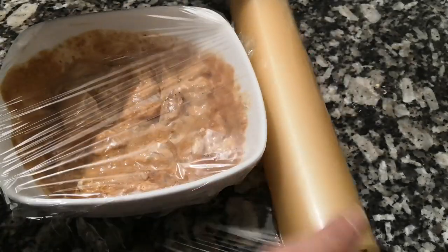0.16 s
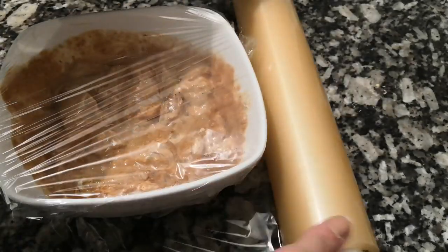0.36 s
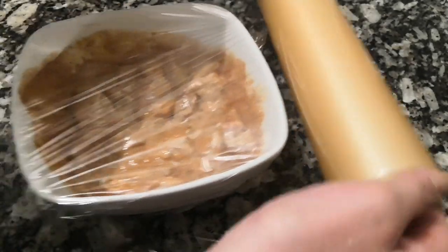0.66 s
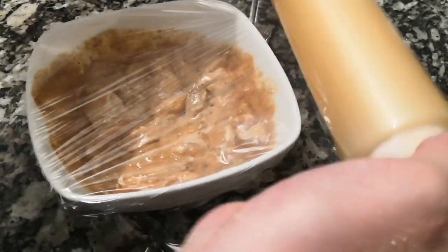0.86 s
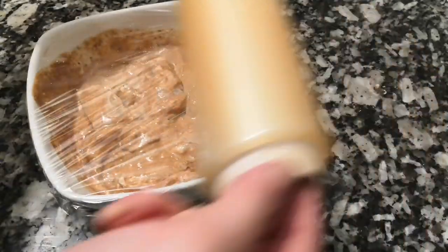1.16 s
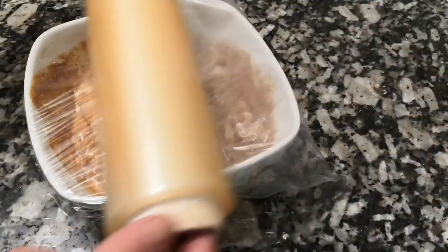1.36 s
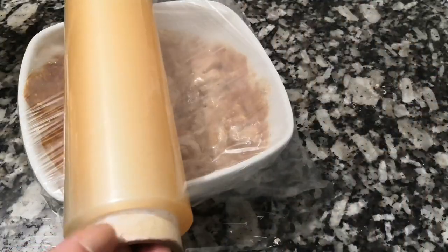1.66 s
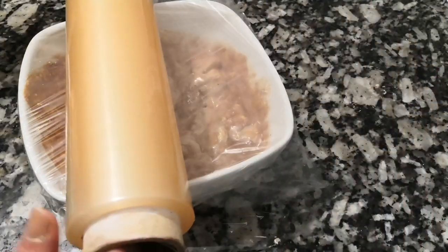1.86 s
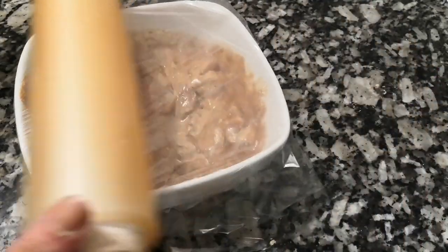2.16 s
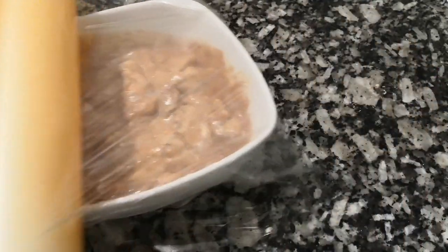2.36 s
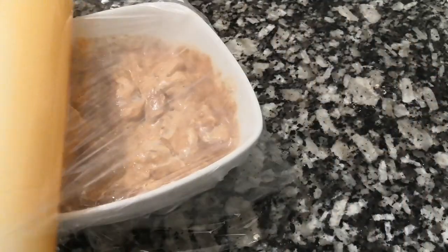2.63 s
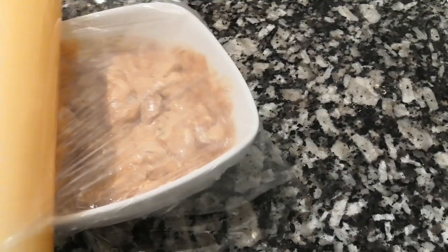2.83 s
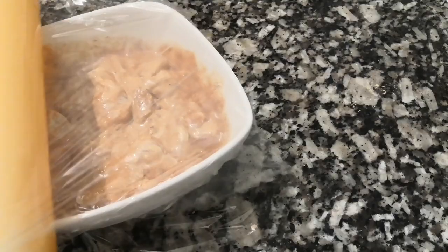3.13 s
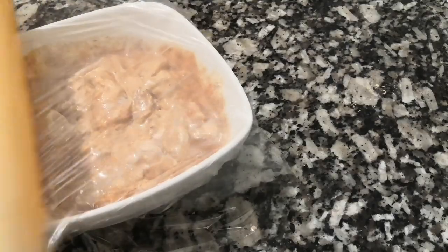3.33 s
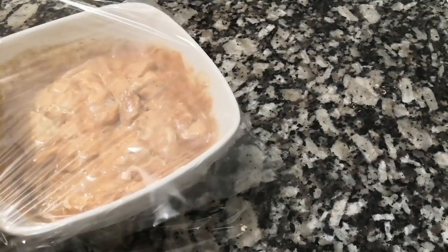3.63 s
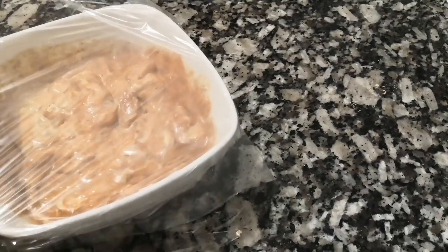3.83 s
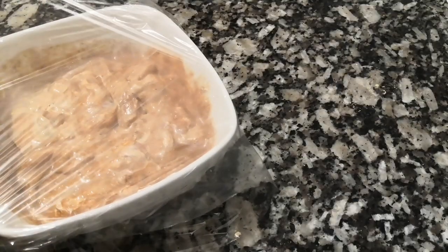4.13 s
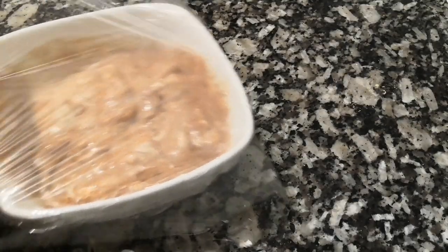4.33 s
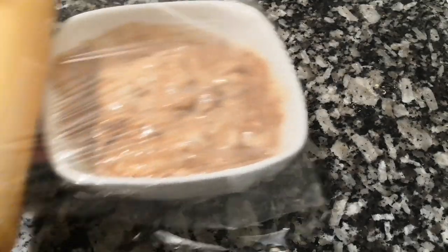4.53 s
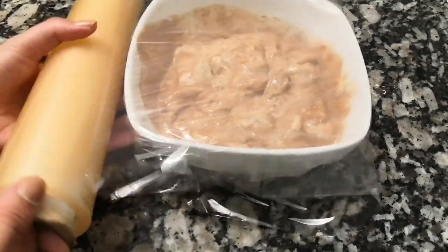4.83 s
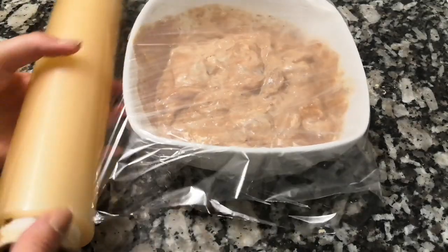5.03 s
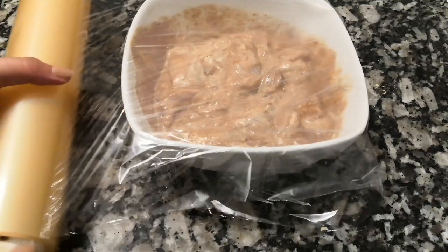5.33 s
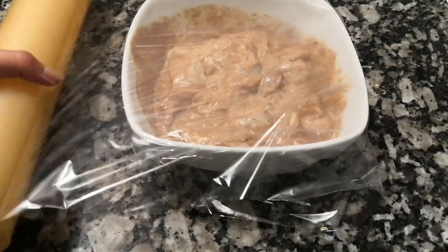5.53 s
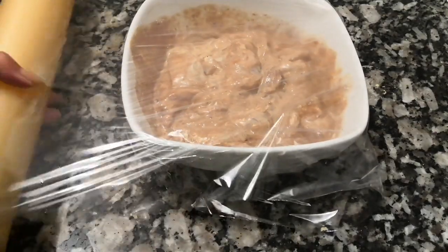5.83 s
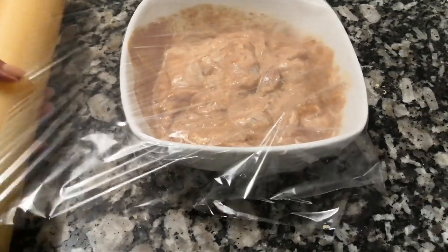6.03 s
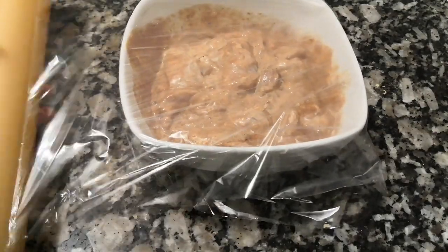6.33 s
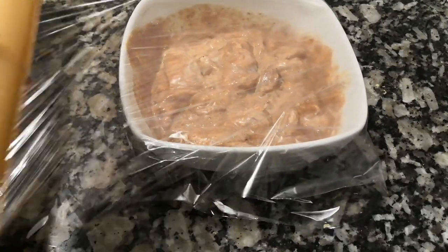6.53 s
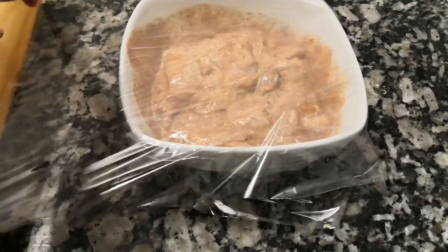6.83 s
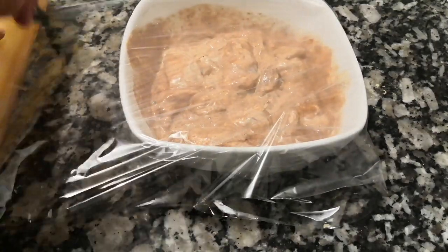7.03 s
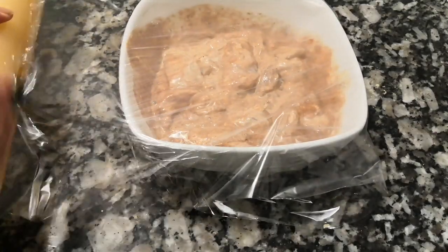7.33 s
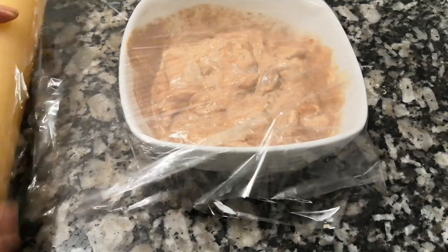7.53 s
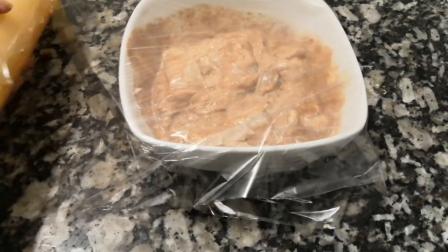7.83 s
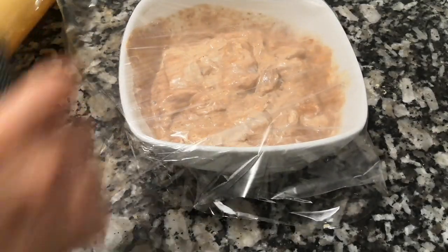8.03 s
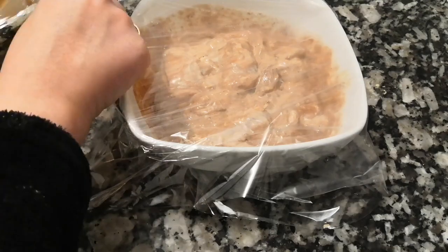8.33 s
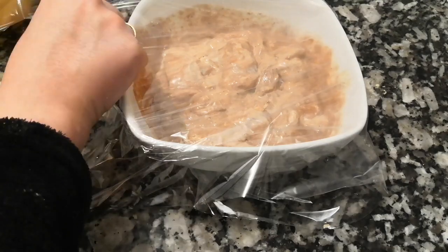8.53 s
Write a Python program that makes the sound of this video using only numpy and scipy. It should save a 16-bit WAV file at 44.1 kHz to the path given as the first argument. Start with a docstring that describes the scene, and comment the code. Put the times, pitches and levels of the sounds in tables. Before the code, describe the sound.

Close-up plastic film fizzes and pops as a heavy roll and bowl knock on stone, then the sheet rips loudly in a kitchen.

```python
"""Film fizzes and snaps over a low hum, amid hard knocks, drags on stone and a dense burst of tearing.
Cling film is drawn off a heavy roll and torn round a bowl on a stone worktop in a small, hard kitchen.
Film sounds are noise bursts through resonances; bowl, roll and worktop ring as sums of damped modes.
Two spaced microphones hear close sounds at different moments, the room as decaying noise.
A noise suppressor turns quiet passages down."""
import sys
import numpy as np
from scipy import signal
from scipy.fft import rfft, irfft, next_fast_len
from scipy.io import wavfile
from scipy.ndimage import uniform_filter1d, minimum_filter1d, map_coordinates

SR = 44100
rng = np.random.default_rng(int(sys.argv[2]) if len(sys.argv) > 2 else 0)


def unload_wav(signal):
    """Save mono or channel-first audio to the path in sys.argv[1] as 16-bit WAV at rate SR, clipped to [-1, 1]."""
    wavfile.write(
        sys.argv[1],
        SR,
        np.round(np.clip(np.atleast_2d(signal).T, -1, 1) * 32767).astype(np.int16),
    )


N = 382788  # samples
LEAD = .00025  # s by which the left microphone hears film and rim before the right


def amp(db):
    """Decibels to a linear gain."""
    return 10 ** (np.asarray(db) / 20)


def unit(x):
    """Scale to rms 1."""
    return x / np.sqrt(np.mean(x ** 2) + 1e-20)


def along(points, hz):
    """Read (Hz, value) points on a log frequency axis."""
    f, v = np.transpose(points)
    return np.interp(np.log(hz + 1), np.log(f + 1), v, left=v[0], right=v[-1])


def wobble(rate):
    """A smooth random curve, rate knots a second."""
    return map_coordinates(rng.standard_normal(size=1000), [np.arange(N) * rate / SR])


def filtered(x, response):
    """Multiply the spectrum of x by a response, real or complex, of frequency."""
    n = x.shape[-1]
    m = next_fast_len(n + 2048)
    return irfft(rfft(x, m) * response(np.fft.rfftfreq(m, 1 / SR)), m)[..., :n]


def coloured(points):
    """A filter response from (Hz, dB) points."""
    return lambda hz: amp(along(points, hz))


def band(hz, q):
    """A resonance of peak gain 1."""
    return lambda f: 1j * f * hz / q / (hz * hz - f * f + 1j * f * hz / q)


def puff(t, attack, life, response):
    """A dying burst of scattered ticks, even in colour before its response; peak 1."""
    shape = amp(-60 * t / life) * (1 - np.exp(-t / attack))
    z = rfft(rng.standard_normal(len(t)) * shape)
    even = irfft(z / np.abs(z), len(t))
    x = filtered(even * np.sqrt(shape), response)
    return x / np.abs(x).max()


def ring(modes, t, attack, scatter_db):
    """Modes struck at new strengths, each dying at its own speed; peak 1."""
    hz, db, t60 = np.transpose(modes)[..., None]
    level = db + scatter_db * rng.standard_normal(hz.shape)
    partials = amp(level - 60 * t / t60) * np.sin(2 * np.pi * hz * t)
    x = partials.sum(0) * (1 - np.exp(-t / attack))
    return x / np.abs(x).max()


FAVOUR_OCTAVES = 0.089  # reach of the modes that a contact point favours


def favoured(modes, centre_hz, lift_db):
    """The point of contact lifts the modes near one pitch."""
    def lift(hz):
        return lift_db * np.exp(-(np.log2(hz / centre_hz) / FAVOUR_OCTAVES) ** 2)
    return [(hz, db + lift(hz), t60) for hz, db, t60 in modes]


def grains(rate, spread_db, clump_db):
    """Random ticks of uneven size, coming in clumps; rms 1."""
    chance, size = rng.random(N), rng.standard_exponential(N)
    struck = chance < rate / SR * amp(clump_db * wobble(55))
    ticks = struck * amp(spread_db * np.minimum(size, 4))
    return unit(ticks * rng.choice([-1, 1], N))


def swell(t, s, rise, hold, fall):
    """Gain that climbs 20 dB in rise seconds up to s, holds, and drops 20 dB in fall seconds."""
    climb = (t - s) / max(rise, .005)
    drop = (s + hold - t) / max(fall, .005)
    return amp(20 * np.minimum(0, np.minimum(climb, drop)))


def add(out, s, x, pan_db, lead):
    """Place a sound between the microphones; the right one hears it lead seconds later."""
    for channel, start, gain in zip(out, (s, s + lead), amp([pan_db / 2, -pan_db / 2])):
        part = channel[round(start * SR):][:len(x)]
        part += gain * x[:len(part)]


# likeness of the two microphones in the room sound: hz, correlation (-1 to 1)
ROOM_LIKENESS = [(30, 0.76), (90, 1), (180, 0.75), (260, 0.91), (380, 0.19), (550, -0.66), (790, -0.13),
                 (1650, 0.18), (7180, -0.12), (15000, -0.23)]


def diffuse(pair):
    """Sound from all sides: alike in the bass, partly opposed in the low mids, near unrelated above."""
    turn = lambda hz: np.arccos(np.clip(along(ROOM_LIKENESS, hz), -1, 1)) / 2
    mid, side = filtered(pair, lambda hz: np.array([np.cos(turn(hz)), np.sin(turn(hz))]))
    return np.array([mid + side, mid - side])


# colour of the kitchen air: hz, level_db (relative)
AIR_COLOUR = [(20, -10), (75, -7.5), (110, -2.5), (280, -8), (630, -18.5), (1000, -23), (2000, -19.5),
              (4000, -27), (8000, -28), (10500, -36), (13000, -43.5), (15300, -42), (16400, -58.5)]
# hum of an appliance: pitch_hz, level_db (rms), waver_hz
HUM_TONES = [(142.9, -62.5, 2.9), (287.5, -68, 9.1), (2000, -76, 0.6), (5240, -86, 1.2)]
AIR_DB = -57.5  # mean level


def background():
    """Diffuse kitchen air as coloured noise, and an appliance's hum as tones wavering in pitch and level."""
    air = unit(filtered(diffuse(rng.standard_normal((2, N))), coloured(AIR_COLOUR)))
    hum = 0
    for hz, db, waver in HUM_TONES:
        phase = 2 * np.pi * np.cumsum(hz + waver * wobble(26)) / SR
        hum = hum + np.sqrt(2) * amp(db + 1.0 * wobble(12.0)) * np.sin(phase)
    return amp(AIR_DB + 0.3 * wobble(1.0)) * air + hum


# the sheet is handled: full_s (the moment the crinkle reaches its full level), rise_s (before it),
# hold_s, fall_s, fizz_db, rustle_db
HANDLING = [(0.0, .05, 0.103, 0.061, -73.5, -68), (0.36, 0.11, 0.31, 0.28, -63, -66),
            (0.757, 0.058, 0.12, 0.14, -62, -70.5), (1.18, 0.15, 0.19, 0.051, -67, -61),
            (1.768, 0.13, 0.48, 0.094, -67.5, -69), (2.004, 0.048, 0.096, 0.13, -55, -60),
            (2.252, 0.057, 0.026, 0.044, -59, -59), (2.079, .02, 0.033, 0.032, -59, -54),
            (2.657, 0.38, 0.13, 0.53, -67.5, -71), (3.04, 0.41, 0.2, 0.05, -70.5, -64.5),
            (3.226, 0.013, 0.057, 0.078, -46.5, -50), (3.446, 0.027, .01, 0.48, -65, -55),
            (3.739, 0.47, 0.21, 0.077, -73.5, -72.5), (4.22, 0.077, 0.0082, 0.051, -62.5, -76.5),
            (4.576, 0.4, 0.12, .05, -63, -86), (4.677, 0.011, 0.09, 0.057, -50.5, -80),
            (4.809, 0.005, 0.035, 0.093, -55, -83), (5.198, 0.061, 0.089, 0.14, -62, -63.5),
            (5.801, 0.23, 0.012, 0.027, -61, -56), (6.04, 0.038, 0.025, 0.16, -68, -59),
            (7.108, 0.0068, 0.046, 0.036, -39, -44), (7.154, 0.2, 0.2, 0.036, -47, -47.5),
            (7.365, 0.027, 0.2, 0.22, -47, -47.5), (8.292, 0.22, 0.1, 0.43, -61.5, -68)]
# colours of the fine and the dull crinkle: hz, level_db (relative)
FIZZ_COLOUR = [(1470, -44.5), (2500, -1), (2680, -7.5), (4270, -6.5), (4960, -3.5), (9080, -8),
               (14400, -35), (15500, -35.5), (16400, -55)]
RUSTLE_COLOUR = [(250, -13.5), (500, -7), (900, 0.5), (1500, 1), (2500, -4), (3500, -6), (5000, -29.5)]


def crinkle():
    """Thousands of tiny creases all over the sheet: a bright fizz and a duller rustle."""
    t = np.arange(0, N + 32, 32) / SR
    gains = sum(amp(row[4:])[:, None] * swell(t, *row[:4]) for row in HANDLING)
    fizz_gain, rustle_gain = (np.interp(np.arange(N) / SR, t, gain) for gain in gains)
    fizz = unit(filtered(grains(rate=910, spread_db=5.5, clump_db=10.0), coloured(FIZZ_COLOUR)))
    rustle = unit(filtered(grains(rate=1000, spread_db=6.0, clump_db=6.0), coloured(RUSTLE_COLOUR)))
    return fizz_gain * fizz + rustle_gain * rustle


# creases of the film popping: start_s, level_db, bright_hz, body_db (re level), body_hz,
# life_s (2 ms at the least)
CREASES = [(0.0557, -39.5, 4980, 12, 2680, 0.003), (0.1938, -43.5, 4480, 15, 3120, 0.003),
           (0.7663, -35.5, 6900, -13, 2075, 0.0099), (0.906, -47, 3000, 5.5, 2004, 0.0023),
           (1.276, -47.5, 6030, 14.5, 2250, 0.0025), (1.395, -41, 7930, -1, 2287, 0.0096),
           (1.714, -39.5, 8900, 2, 880, 0.0017), (1.896, -42, 7000, 0.5, 1605, 0.0034),
           (1.9056, -38.5, 6420, -3, 1622, 0.0032), (1.917, -36.5, 7850, -6, 1550, 0.0014),
           (1.9935, -35, 7580, -0.5, 1630, 0.008), (2.0054, -29.5, 9100, -3.5, 2350, 0.0048),
           (2.0436, -35.5, 4750, 2.5, 2330, 0.013), (2.078, -27, 7440, 0, 2560, 0.011),
           (2.089, -16.5, 6900, 0.5, 2100, 0.014), (2.4945, -40.5, 7860, 2, 905, 0.0064),
           (2.534, -46, 9000, 13.5, 1150, 0.0031), (2.782, -45.5, 7500, -3, 2500, 0.003),
           (3.0964, -35.5, 7640, -16, 900, 0.0035), (3.138, -38.5, 7070, -1.5, 2380, 0.0044),
           (3.179, -43.5, 7500, -8, 2000, 0.0036), (3.211, -40, 6860, 5, 2660, 0.0035),
           (3.22, -32, 7850, 3.5, 1740, 0.013), (3.2357, -19.5, 7400, -2, 1400, 0.004),
           (3.256, -22.5, 7050, 2, 1650, 0.0029), (3.291, -22, 8200, 0.5, 1413, 0.005),
           (3.5207, -39.5, 8500, 6.5, 1580, 0.0089), (3.583, -25.5, 8240, -0.5, 1700, 0.0034),
           (3.662, -28, 8600, -1, 1704, 0.0075), (3.923, -37, 9060, -7, 2520, 0.0024),
           (4.682, -42, 7830, 2, 2320, 0.0096), (5.087, -41.5, 9000, -10, 2350, 0.0024),
           (5.099, -44, 8200, -17, 2350, 0.0028), (5.2625, -43, 8800, 1.5, 1420, 0.0031),
           (5.457, -44, 7700, 0, 1940, 0.0038), (5.471, -44, 4440, -6, 1850, 0.0027),
           (5.801, -40, 6000, 10.5, 2630, 0.004), (6.8067, -33, 5780, -6.5, 1380, 0.0054),
           (7.0568, -41, 6900, 0, 1465, 0.0038), (7.103, -10, 5320, -8, 1357, 0.0049),
           (7.1066, -17, 7130, 0, 1600, 0.018), (7.116, -18.5, 6730, -4.5, 1590, 0.011),
           (7.1214, -23.5, 6530, 2.5, 1595, 0.014), (7.1293, -18.5, 7970, 0, 1900, 0.0025),
           (7.135, -17, 5210, 0, 1834, 0.0054), (7.156, -24, 6000, 0.5, 1180, 0.004),
           (7.1595, -15.5, 7900, -8, 1187, 0.004), (7.1865, -22, 9240, -7, 1336, 0.005),
           (7.198, -27, 5520, -3, 1657, 0.0026), (7.216, -23, 7340, -11, 1354, 0.003),
           (7.2547, -28.5, 6000, -4, 3200, 0.0029), (7.263, -31, 7540, -2, 2000, 0.0031),
           (7.2804, -26, 5760, -2, 2730, 0.0038), (7.292, -29.5, 8070, 1.5, 2195, 0.0055),
           (7.3373, -28, 7800, -10, 2400, 0.01), (7.3397, -27, 5400, -2, 1900, 0.005),
           (7.346, -24.5, 7800, -4.5, 2410, 0.004), (7.35, -20, 8000, -3.5, 2740, 0.004),
           (7.37, -28, 7800, -6.5, 2000, 0.0089), (7.3923, -39.5, 8130, -4.5, 2480, 0.0052),
           (7.398, -33, 6000, -1.5, 1320, 0.008), (7.4135, -24, 8000, 0, 3100, 0.006),
           (7.4198, -34.5, 8000, -8.5, 2570, 0.0026), (7.443, -27.5, 8000, -2.5, 3480, 0.0051),
           (7.444, -17, 8260, -10, 2730, 0.0012), (7.4588, -11.5, 8600, -9.5, 2320, 0.0017),
           (7.473, -23.5, 4950, -3, 2654, 0.0045), (7.486, -22.5, 7000, -1.5, 2350, 0.0044),
           (7.5218, -18.5, 8300, -4, 3320, 0.0019), (7.5445, -7, 7430, -9.5, 3100, 0.0044),
           (7.5519, -12, 7480, -11, 3180, 0.0017), (7.5538, -20.5, 8500, -4, 3290, 0.0019),
           (7.5724, -10.5, 5500, 2, 2790, 0.0036), (7.576, -16, 5600, -0.5, 2030, 0.007),
           (7.589, -29, 5530, -6, 3000, 0.004), (7.627, -27.5, 5500, -1, 2900, 0.0036),
           (7.772, -34.5, 5500, -4, 2600, 0.0035), (7.828, -36, 7500, -8, 2800, 0.0025),
           (8.2912, -28, 6000, -11, 1420, 0.0055), (8.371, -41, 6930, -2, 1260, 0.0029),
           (8.397, -39, 7470, -1, 1450, 0.0027), (8.442, -41, 7540, -8, 1310, 0.0034),
           (8.462, -50, 6930, 2, 1050, 0.003), (8.467, -45, 5000, 6.5, 1386, 0.003),
           (8.496, -42, 5970, -4, 1020, 0.0057), (8.648, -32.5, 7100, 4.5, 1840, 0.0033)]
FILM_PAN_DB, FILM_PAN_SPREAD_DB = -1, 6  # where the film sits, left over right
TAIL_DB, TAIL_LIVES = -10, 3.2  # the film round a crease rustles on: level re the snap, life in snap lives


def snaps():
    """A crease flips in a short burst that rings a bright patch of film and, longer, a low one."""
    out, t = np.zeros((2, N)), np.arange(SR // 15) / SR
    for s, db, bright_hz, body_db, body_hz, length in CREASES:
        life = max(length, .002)
        pan_db = FILM_PAN_DB + FILM_PAN_SPREAD_DB * rng.standard_normal()

        def bright_patch(f):
            return (band(bright_hz, 3)(f) + 0.63) * band(6000, .8)(f) / (1 + .9j * (f / 10000) ** 6)

        def low_patch(f):
            peaks = band(body_hz, 1.5)(f) ** 2 + 0.3 * band(1500, 1.2)(f) + 0.14 * band(280, .8)(f)
            return peaks / (1 + 1j * (f / 3000) ** 4)

        def surroundings(f):
            return band(bright_hz, 1.2)(f) / (1 + 1j * (f / 10500) ** 5)

        bright = puff(t, 0.00079, life, bright_patch)
        body = puff(t, 0.0013, 2.4 * life, low_patch)
        lead = LEAD * (1 + 0.3 * rng.standard_normal())
        add(out, s, amp(db) * (bright + amp(body_db) * body), pan_db, lead)
        for channel in out:  # the tail is separate noise at each microphone
            tail = puff(t, 0.001, TAIL_LIVES * life, surroundings)
            channel[round(s * SR):][:len(t)] += amp(db + TAIL_DB) * tail[:N - round(s * SR)]
    return out


# bowl or roll meets the worktop: start_s, level_db, favoured ring_hz, its lift_db, thud_db,
# favoured thud_hz, clack_db, boom_db (thud, clack and boom re level),
# pan_db (left over right: whole for the rim, half for the bowl, a quarter for the cabinet)
BLOWS = [(0.061, -19.5, 820, 4.5, -9.5, 414, -14, -16, -10),
         (0.0647, -26.5, 1290, 24, 7, 434, -30, -28, -1),
         (0.195, -27.5, 710, 3.5, 7, 300, -10.5, -4.5, -9.5), (0.366, -56, 604, 11, 14.5, 267, -20, 9, 3),
         (1.439, -10.5, 1027, 5.5, -3, 403, -8.5, -20.5, -5),
         (1.4506, -16, 1270, 36, -16, 270, -19, -32, 4.5),
         (1.654, -33.5, 678, 10, 1, 368, -13.5, -6.5, -9.5), (2.181, -25, 1074, 25, -4, 366, -5.5, -12, 3),
         (2.392, -26, 910, -5, -0.5, 446, -13.5, -10, -9.5),
         (2.839, -29, 665, 26.5, -10.5, 270, -25, -16, -7.5),
         (2.935, -30.5, 1057, 15, 0.5, 303, -12, -8.5, -6.5),
         (3.138, -39, 850, 8, -30.5, 330, -7, -33, 3.5), (3.429, -15.5, 850, -1.5, -8, 389, -4.5, -17, -6),
         (3.4411, -23, 1260, 25, -0.5, 275, -18, -39, -4), (3.775, -41, 815, 12.5, 6, 363, -9, 0.5, -6),
         (4.827, -15, 1014, 9.5, -0.5, 374, -4, -19, 3.5),
         (5.043, -44.5, 767, 14, 8.5, 252, -21, 11.5, -11), (5.577, -38, 1030, 10, 6, 390, -9, -5, -14.5),
         (6.3622, -38.5, 1350, 8, 5, 268, -31, -22.5, -38), (6.3709, -26, 1150, -1, 3, 452, -36, -9.5, -3),
         (8.578, -33.5, 738, 6, -0.5, 302, -22, -15, -15)]
# ringing modes of bowl body, bowl rim, cabinet, and the kitchen's air: pitch_hz, level_db (relative), t60_s
BOWL_MODES = [(624, -6.5, 0.29), (708, -1, 0.061), (842.4, 2, 0.052), (1017, 4.5, 0.049), (1100, -10, 0.04),
              (1271, -3, 0.035), (1339, -5, 0.049)]
RIM_MODES = [(1492, 2, 0.0059), (1710, 2, 0.013), (1924, 6.5, 0.084), (2060, -12, 0.078),
             (2475, -2.5, 0.078), (2737, -3, 0.06), (2810, -14.5, 0.037), (3430, -10, 0.086),
             (3760, -7.5, 0.06), (4700, -15, 0.06)]
CABINET_MODES = [(264.2, 4, 0.078), (335.7, 9, 0.041), (386, 3.5, 0.058), (412.6, 2, 0.05)]
AIR_MODES = [(68, -3, 0.59), (128, 0.5, 0.37), (159, 4, 0.33)]
# colours of the dense short modes, low and high: hz, level_db (relative)
RATTLE_COLOUR = [(150, -46), (350, -1), (550, 4.5), (800, 7), (1200, 4.5), (1800, -2.5), (2800, -19.5),
                 (4000, -41)]
CLACK_COLOUR = [(900, -18), (1600, -0.5), (2100, -2), (2800, -17.5), (4000, -28), (9000, -15.5),
                (14000, -47.5)]
LAG = 0.00083  # s by which the left microphone hears the body of the bowl later
THUD_FAVOUR_DB = 11  # lift of the favoured cabinet modes


def knocks():
    """Each blow rings bowl, rim and cabinet amid dense short modes; the air modes build up more slowly."""
    near, boom, slow = np.zeros((2, N)), np.zeros((2, N)), np.arange(SR // 2) / SR
    t = slow[:SR // 5]
    for s, db, ring_hz, lift_db, thud_db, thud_hz, clack_db, boom_db, pan_db in BLOWS:
        bowl = 0.94 * ring(favoured(BOWL_MODES, ring_hz, lift_db), t, attack=0.0012, scatter_db=2.5)
        # the more one pitch stands out, the less rattle
        rattle = amp(4 - 0.62 * lift_db) * puff(t, 0.0023, 0.033, coloured(RATTLE_COLOUR))
        rim = 0.48 * ring(RIM_MODES, t, attack=0.00027, scatter_db=-0.5)
        clack = 2.7 * puff(t, 0.00044, 0.014, coloured(CLACK_COLOUR))
        add(near, s - .0012, amp(db) * (bowl + rattle), pan_db / 2, -LAG)
        add(near, s - .0012, amp(db + clack_db) * (rim + clack), pan_db, LEAD)
        cabinet = favoured(CABINET_MODES, thud_hz, THUD_FAVOUR_DB)
        thud = ring(cabinet, t, attack=0.0023, scatter_db=4.5)
        add(near, s, amp(db + thud_db) * thud, pan_db / 4, 0)
        air = ring(AIR_MODES, slow, attack=0.028, scatter_db=4.5)
        add(boom, s, amp(db + boom_db) * air, 0, 0)
    return near, boom


# fingers brushing the film: middle_s, level_db, colour_hz, length_s (sets the swell's width),
# pan_db (left over right)
BRUSHES = [(0.0796, -45, 9700, 0.0048, 16), (0.488, -42.5, 2510, 0.014, -16),
           (0.552, -49.5, 2300, 0.034, 20), (4.695, -50.5, 2450, 0.02, -8), (4.752, -38.5, 4320, 0.016, 10),
           (4.753, -36.5, 8100, 0.017, 5.5), (5.0393, -33.5, 4270, 0.0022, -2),
           (5.093, -45, 2520, 0.025, 5.5), (6.063, -52.5, 3560, 0.004, -8), (6.1, -54.5, 7750, 0.016, 2),
           (6.115, -53, 3750, 0.018, -5), (7.496, -39.5, 3200, 0.031, -2), (7.613, -35.5, 2990, 0.025, -4),
           (7.674, -37, 2630, 0.025, -3), (7.791, -47.5, 2800, 0.02, -1), (7.01, -44.5, 7340, 0.03, 1.5),
           (8.299, -37.5, 6040, 0.013, -2.5)]


def swishes():
    """Skin on film: a soft swell of noise round one broad colour."""
    out, t = np.zeros((2, N)), np.arange(SR // 4) / SR
    for s, db, hz, length, pan_db in BRUSHES:
        hump = np.exp(-((t - 2 * length) / (0.93 * length)) ** 2) * rng.standard_normal(len(t))

        def colour(f):
            return (band(hz, 5.5)(f) + 0.17) * band(4000, .5)(f) / (1 + 1j * (f / 10000) ** 4)

        x = filtered(hump, colour)
        add(out, s - 2 * length, amp(db) * x / np.abs(x).max(), pan_db, LEAD)
    return out


# drags on stone: full_s (end of the rise), length_s, first_db, last_db, favoured pitch_hz
DRAGS = [(1.19, 0.08, -68, -56, 1027), (2.483, 0.0087, -58, -54, 1230), (4.273, 0.187, -64.5, -56.5, 1290),
         (4.285, 0.13, -58.5, -62, 1040), (4.442, 0.21, -57, -53.5, 1050), (4.503, 0.017, -53, -62, 630),
         (4.58, 0.046, -55, -55, 1340), (4.335, 0.023, -58, -58.5, 840), (4.456, 0.012, -49.5, -55, 1030),
         (4.608, 0.012, -55.5, -58, 1010), (4.645, 0.012, -49, -58, 1040), (4.683, 0.011, -53, -55, 630),
         (4.676, 0.073, -48.5, -52.5, 1075), (5.813, 0.021, -54, -44.5, 1010),
         (5.877, 0.19, -56, -68, 1044), (6.283, 0.073, -56, -56, 1320)]
DRAG_RISE_S, DRAG_FALL_S = 0.014, 0.022  # for 20 dB
EVEN = .55  # rubbing stirs the modes more evenly than a blow: share of their dB kept
DRAG_LIFT_DB = 17  # lift of the modes under the contact, before EVEN shrinks it


def slide():
    """The foot of the bowl catches on the stone grain and stirs the same modes, damped by the contact."""
    out, t = np.zeros(N), np.arange(N) / SR
    catches = grains(rate=1100, spread_db=4.0, clump_db=5.0)
    for s, length, first_db, last_db, ring_hz in DRAGS:
        part = slice(round(s * SR) - SR // 10, round((s + length) * SR) + SR // 5)
        modes = favoured(BOWL_MODES, ring_hz, DRAG_LIFT_DB) + RIM_MODES

        def body(f):
            total = sum(amp(EVEN * db) * 1j * f / (c * c - f * f + 1j * f * (35 + 1 / t60))
                        for c, db, t60 in modes)
            return total / (1 + (f / 3200) ** 4)

        level = amp(np.interp(t[part], [s, s + length], [first_db, last_db]))
        level = level * swell(t[part], s, DRAG_RISE_S, length, DRAG_FALL_S)
        stirring = np.roll(catches, rng.integers(N))[part]
        out[part] += level * unit(filtered(stirring, body))
    return out


# narrow ringing bursts: film squeaks, and the ringing and crackle after the tear:
# start_s, level_db, pitch_hz, upper_hz
RINGING_BURSTS = [(5.0025, -35, 1550, 2660), (5.01, -33, 2230, 2420), (5.0356, -30.5, 2580, 3500),
                  (5.8015, -24, 2250, 3100), (5.8115, -21.5, 2280, 2580), (5.8225, -28.5, 2250, 2960),
                  (5.8315, -30, 3150, 2300), (5.8355, -26.5, 1770, 2600), (5.846, -30, 1790, 2500),
                  (5.86, -35.5, 2200, 1800), (5.8715, -28, 1180, 2220), (5.8765, -25, 1820, 2300),
                  (5.8934, -23.5, 2950, 2720), (5.8965, -23, 1760, 1220), (5.92, -35.5, 1720, 2840),
                  (5.932, -40, 1900, 2970), (5.944, -38, 1680, 2840), (5.958, -34.5, 1764, 2500),
                  (6.118, -45, 1700, 3770), (7.598, -26.5, 2100, 3200), (7.621, -33, 2050, 2900),
                  (7.652, -29.5, 2050, 3120), (7.675, -34, 2100, 2900), (7.7725, -35.5, 2100, 2910),
                  (7.7745, -40.5, 1400, 2100)]
BURST_LIFE_S, BURST_PAN_DB = 0.034, -1.5  # pan is left over right


def squeaks():
    """Squeaks, and ringing and crackle after the tear: noise bursts through two narrow resonances."""
    out, t = np.zeros((2, N)), np.arange(SR // 10) / SR
    for s, db, hz, upper_hz in RINGING_BURSTS:
        def tone(f):
            pair = band(hz, 12)(f) + 0.37 * band(upper_hz, 7)(f)
            return pair / (1 + 1j * (f / 4000) ** 4) + 0.058 * band(5350, 5)(f) ** 4

        add(out, s, amp(db) * puff(t, 0.00086, BURST_LIFE_S, tone), BURST_PAN_DB, LEAD / 2)
    return out


# how fast the hard walls let each frequency die: hz, t60_s
WALL_DECAY = [(100, 0.98), (300, 0.52), (1000, 0.37), (2000, 0.41), (3300, 0.37), (4500, 0.39),
              (8000, 0.35), (15000, 0.42)]


def kitchen(x):
    """Reverberation, each frequency dying at its own speed; a fresh random tail for each third of a second."""
    out, step, length = np.zeros((2, N + SR)), SR // 3, SR * 2 // 3
    for start in range(0, N, step):
        hz, t, z = signal.stft(rng.standard_normal((2, length)), SR, nperseg=256)
        decay = amp(-60 * t / along(WALL_DECAY, hz)[:, None])
        tail = diffuse(signal.istft(z * decay, SR, nperseg=256)[1][:, :length])
        tail *= 1 - np.exp(-(np.arange(length) / SR / 0.00026) ** 2)  # builds up in under a millisecond
        wet = signal.fftconvolve(x[None, start:start + step], tail / np.linalg.norm(tail[0]), axes=1)
        out[:, start:start + wet.shape[1]] += wet
    return out[:, :N]


# balance of film, drags, room and background between the microphones: hz, pan_db (left over right)
BALANCE = [(60, 1.5), (150, -0.5), (380, 0.5), (950, -2), (2380, -2.5), (5980, -2.5), (15000, 2.5)]


def scene():
    """Near sounds reach the two microphones at different moments; the room answers knocks, film and drags."""
    near, boom = knocks()
    near = filtered(near, lambda hz: 1 / (1 + (hz / 4800) ** 4))  # a cushion of film dulls each blow
    film = snaps() + swishes() + squeaks()
    spread = crinkle() + slide()
    wet = kitchen(amp(-4.0) * near[1] + amp(-5.5) * film[1] + amp(3.5) * spread)
    spread_pair = np.array([spread, np.roll(spread, round(LEAD * SR))])
    wide = wet + film + spread_pair + background()
    wide = filtered(wide, lambda hz: amp(along(BALANCE, hz) * np.array([[.5], [-.5]])))
    return near + boom + wide


def suppress(x, knee_db, cut_db, hold):
    """The gain drops by up to cut_db once the level has stayed low for hold seconds."""
    level_db = 10 * np.log10(np.abs(uniform_filter1d((x ** 2).mean(0), size=400)) + 1e-12)
    half = round(hold / 2 * SR)
    held_db = np.roll(-minimum_filter1d(-level_db, 2 * half + 1), half)  # loudest of the last hold seconds
    gain_db = -cut_db / (1 + np.exp((held_db - knee_db) / 2.0) / 1.5)
    return x * amp(uniform_filter1d(gain_db, size=250))


TOP_HZ = 16500  # nothing passes above
DIP_HZ, DIP_SHARE = 4430, 0.23  # a shallow dip in the microphones' response


def record(dry):
    """Noise suppressor, microphone colour, then the band limit."""
    quiet = suppress(dry, knee_db=-44.0, cut_db=6.0, hold=0.034)
    return filtered(quiet, lambda hz: (1 - DIP_SHARE * band(DIP_HZ, 4.5)(hz)) * (hz < TOP_HZ))


dry = scene()
out = record(dry)
unload_wav(out)
```